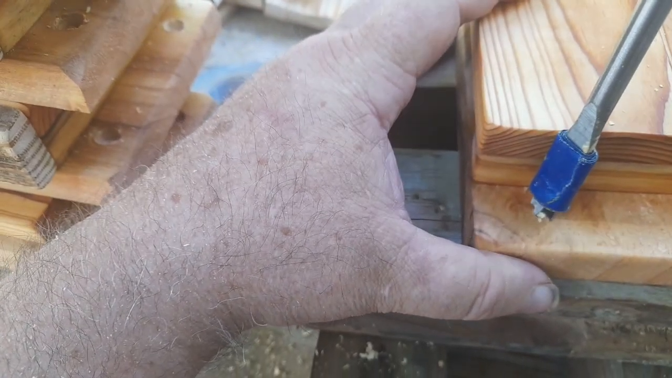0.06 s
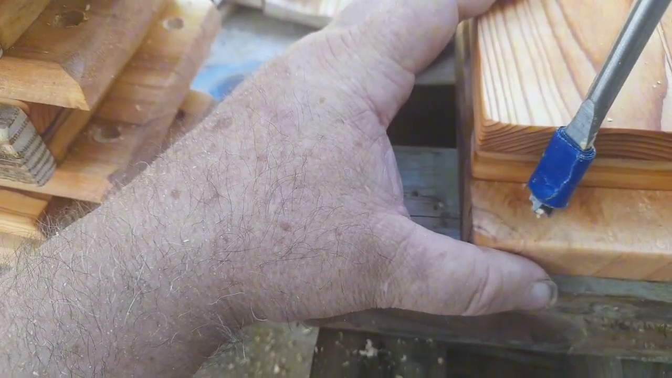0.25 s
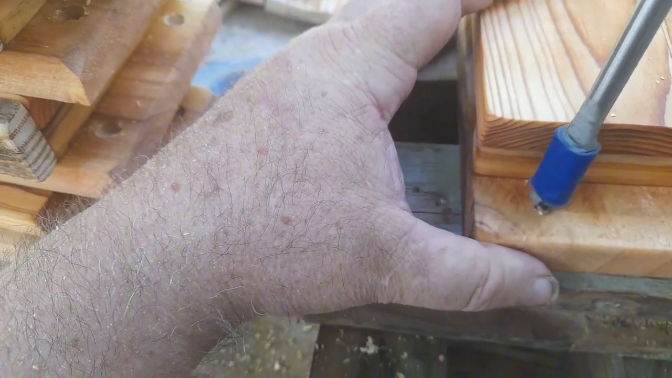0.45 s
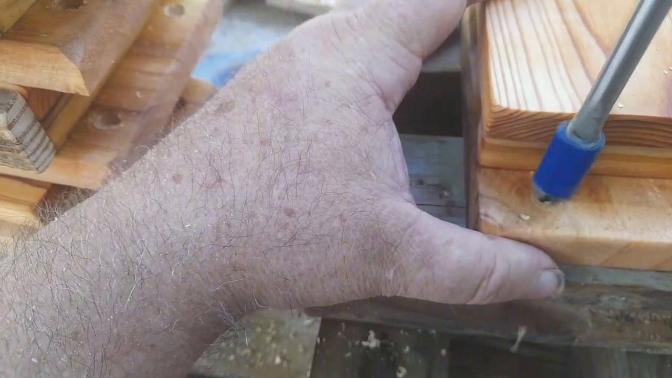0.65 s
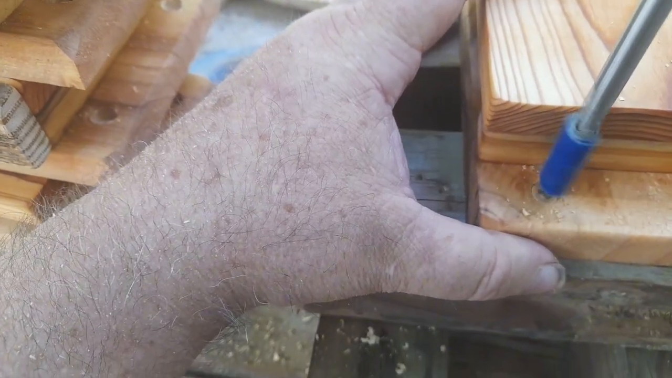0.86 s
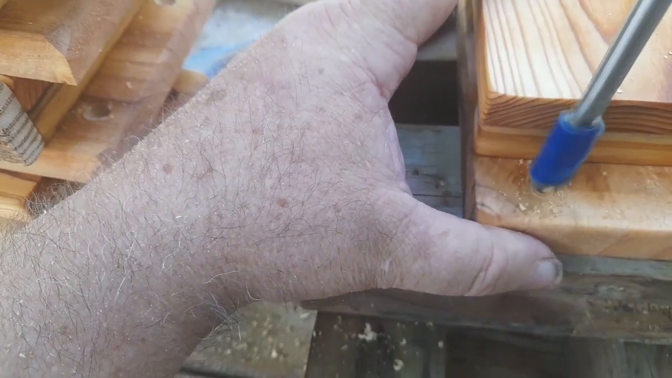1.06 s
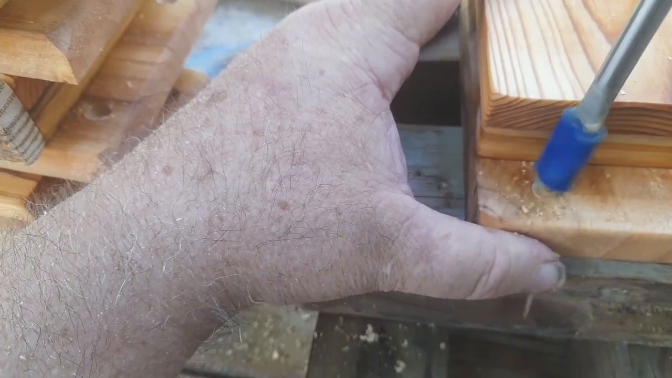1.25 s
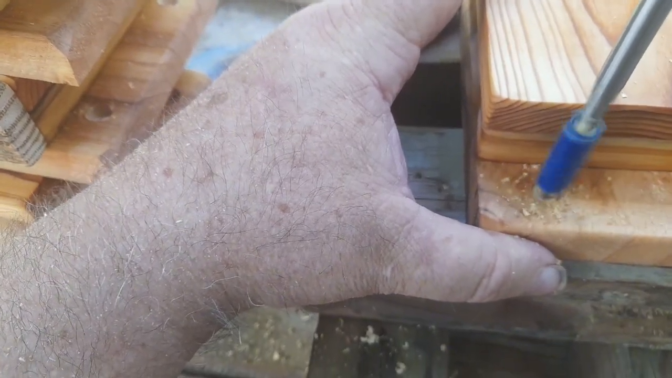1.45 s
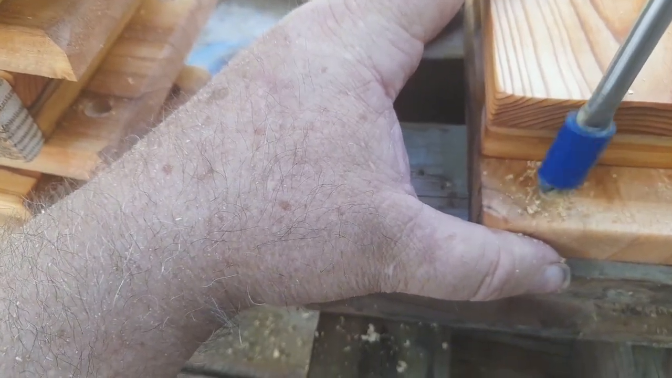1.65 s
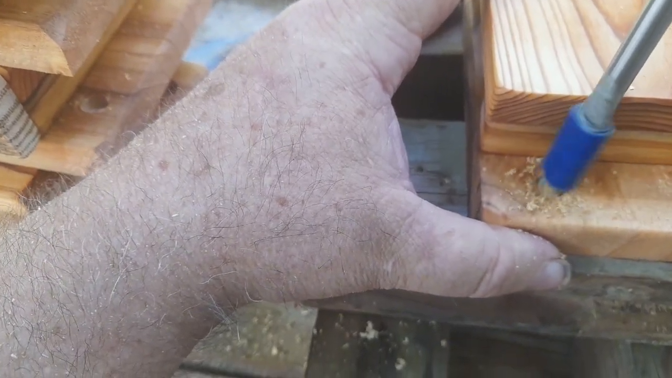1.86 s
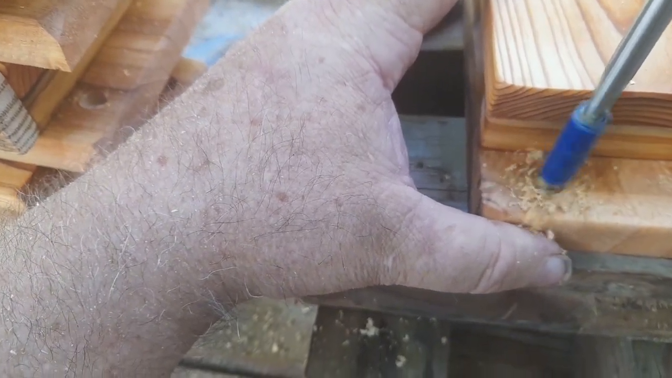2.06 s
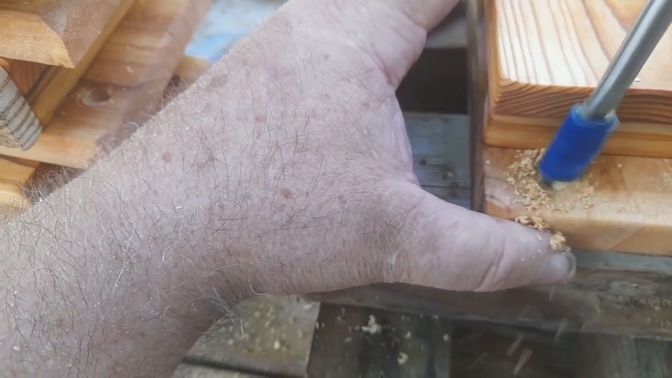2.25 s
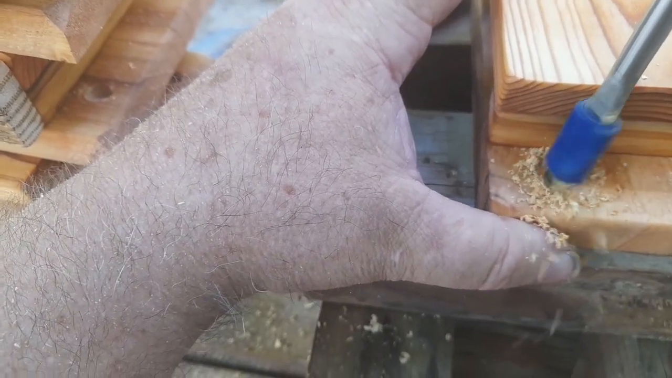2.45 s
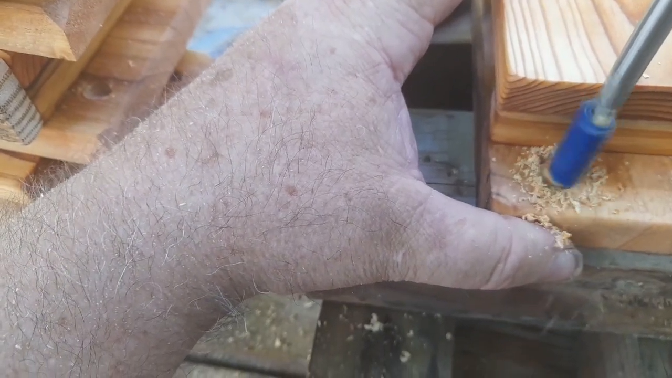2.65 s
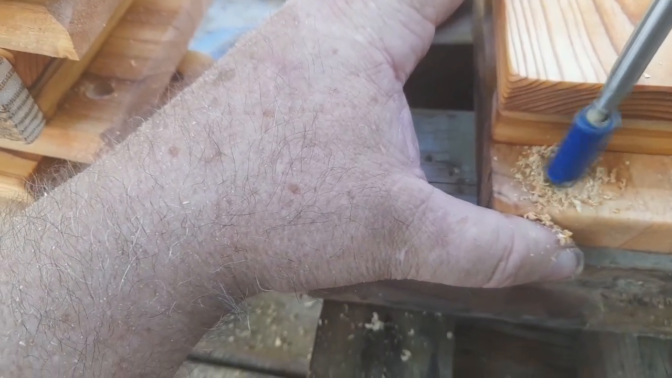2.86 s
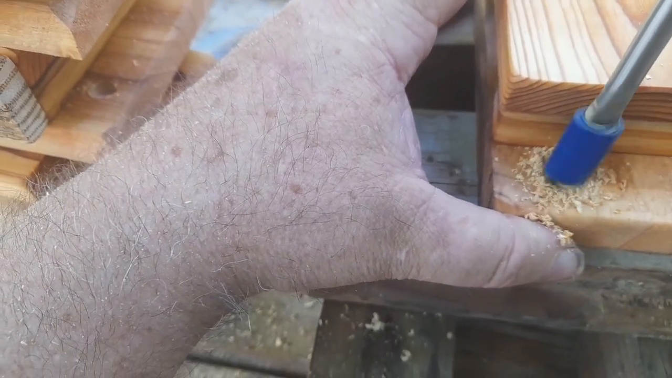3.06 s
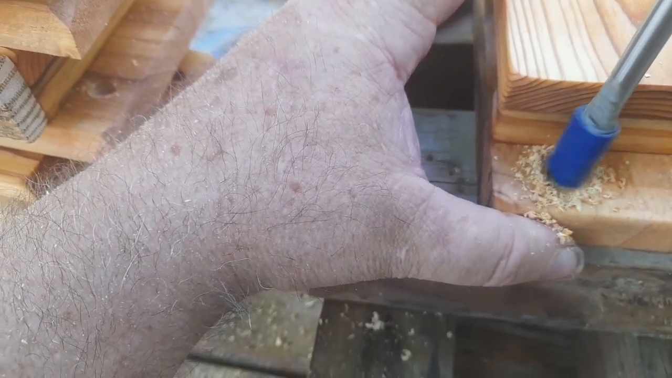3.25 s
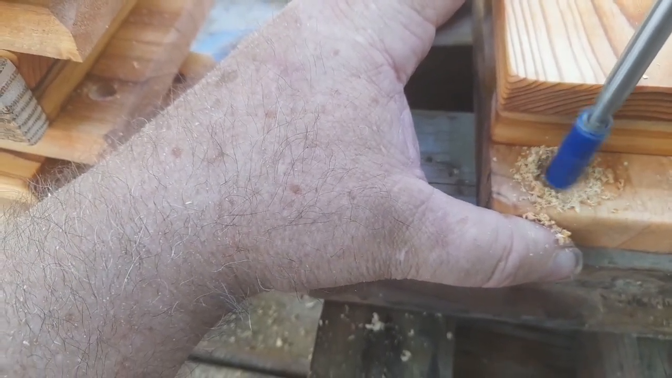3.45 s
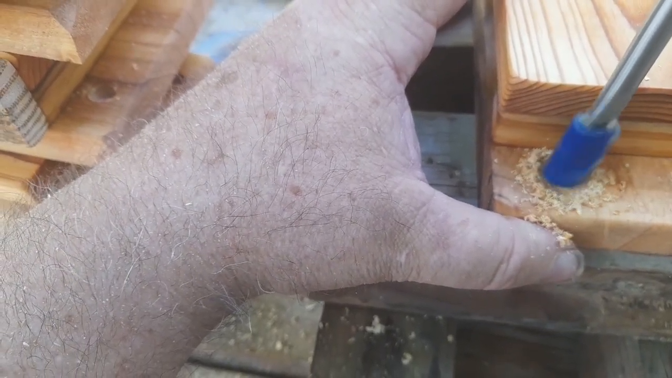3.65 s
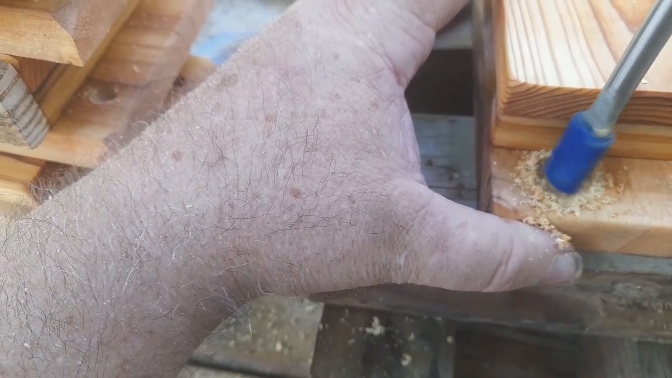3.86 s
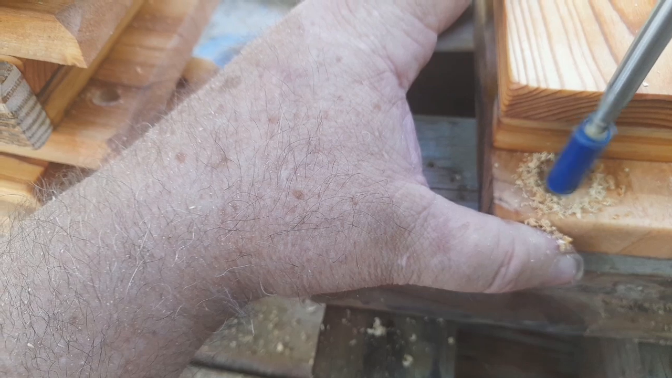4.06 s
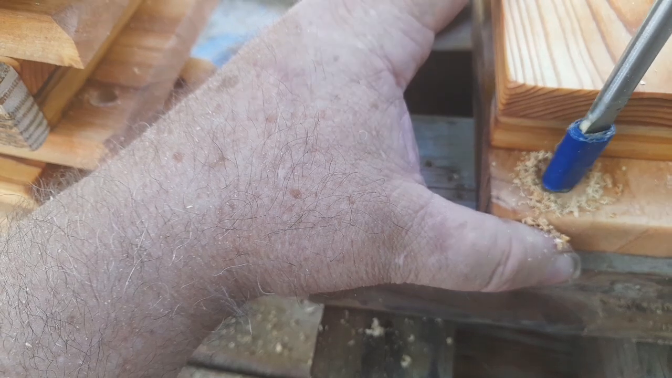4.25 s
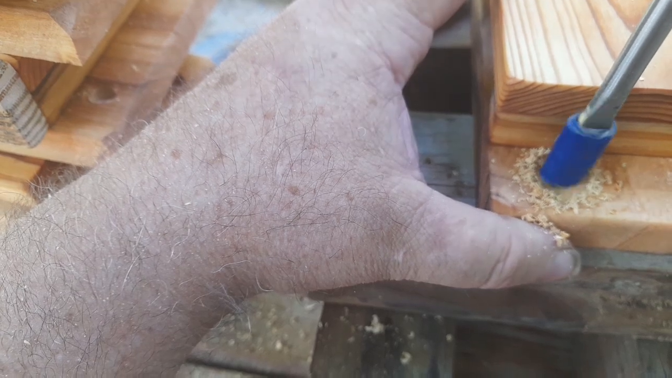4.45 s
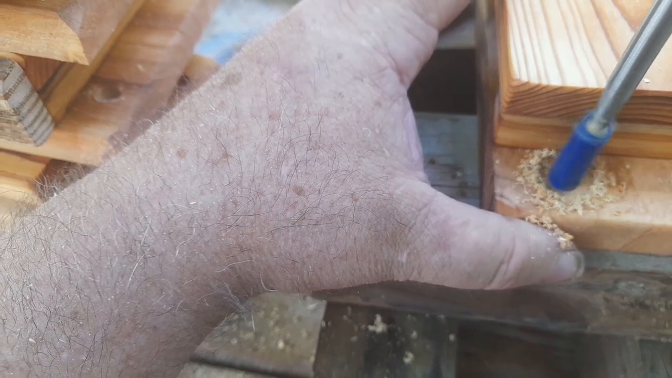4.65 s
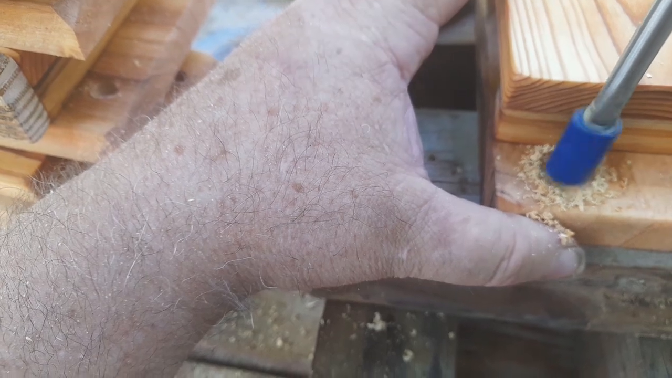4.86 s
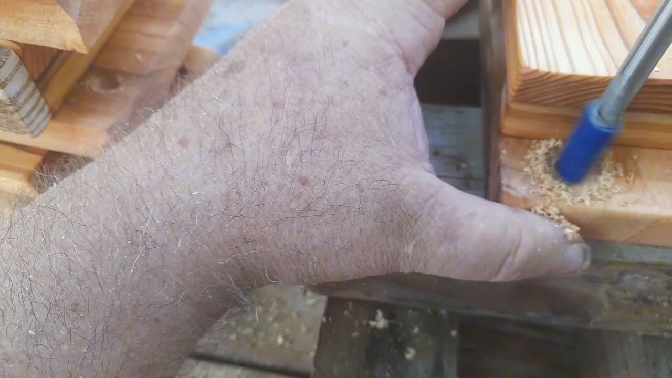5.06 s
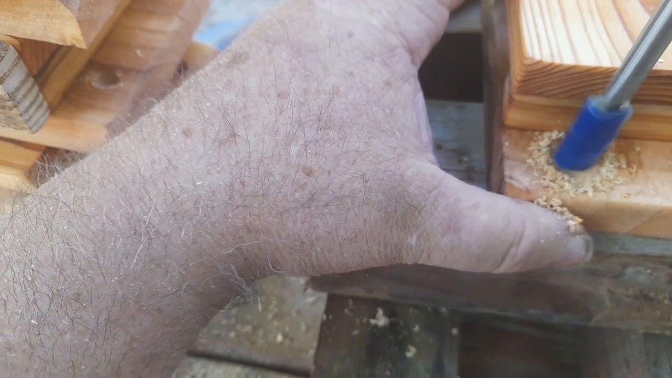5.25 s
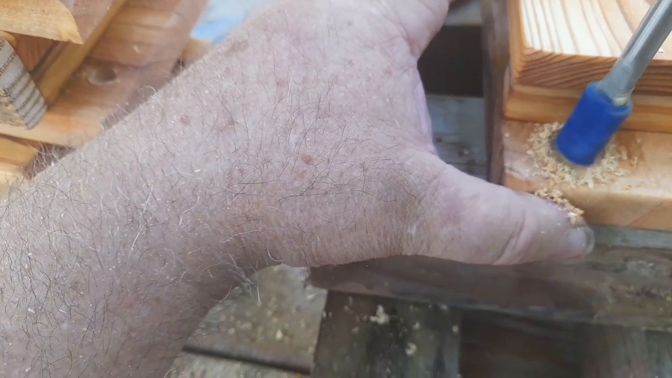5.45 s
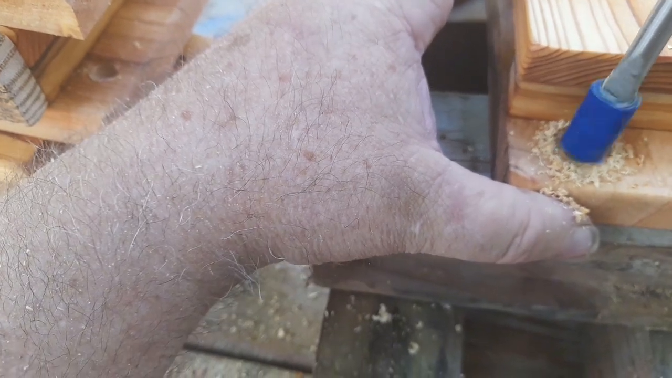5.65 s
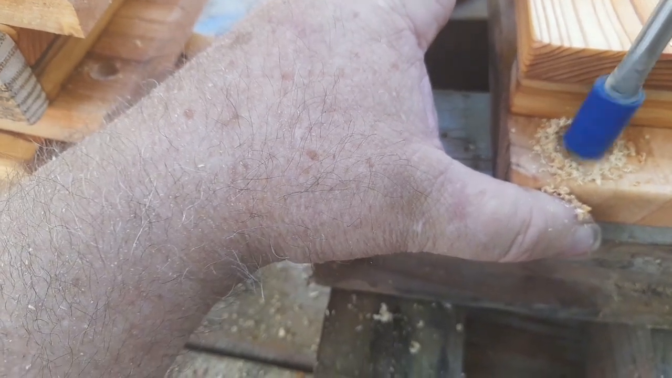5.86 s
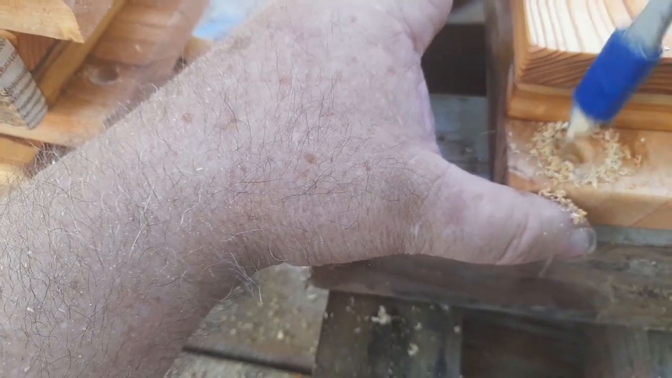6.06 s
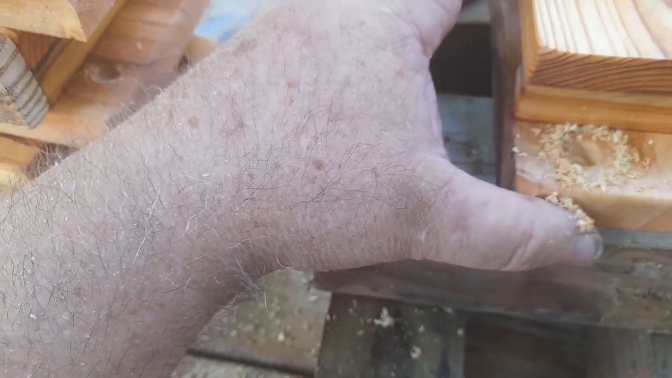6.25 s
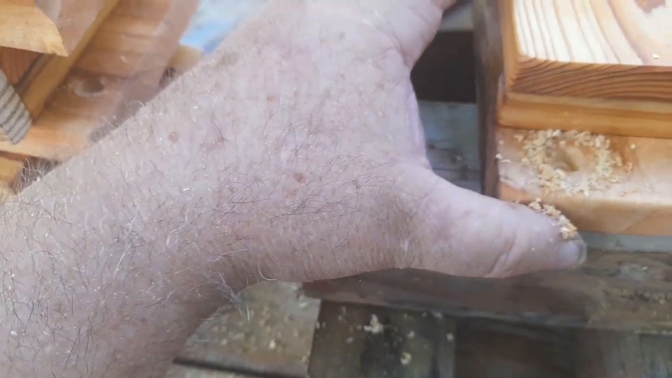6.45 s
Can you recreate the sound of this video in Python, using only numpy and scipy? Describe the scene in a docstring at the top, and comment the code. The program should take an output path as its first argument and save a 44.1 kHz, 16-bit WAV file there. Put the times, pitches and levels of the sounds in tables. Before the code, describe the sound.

Close stereo microphone, the tool slightly to the right, with a faint drone and hiss behind. A motor whine swells, roughens, then the drill roars into a small wooden box, humming, clattering and scraping for nearly four seconds. It halts fast, a soft thud follows, and two more trigger pulls come: one about a second long, one very short and lighter. Clicks of the housing mark the gaps.

```python
"""Power drill in a small wooden box

A power drill with a spade bit runs in three bursts, close by, over a faint drone and hiss: two cut into
the box, and the last spins almost free after the bit backs out; each burst ends under the brake.
The stalled motor whines as a swelling octave that breaks into a rasp, then sine tones hum with its speed.
Throbbing noise and random snaps make the gears' rattle and the bit's scraping, ringing through the box.
Clicks ring the housing; one dull knock falls between the first two bursts."""
import sys
import numpy as np
from scipy import signal
from scipy.fft import rfft, irfft, next_fast_len
from scipy.io import wavfile

SR = 44100
rng = np.random.default_rng(int(sys.argv[2]) if len(sys.argv) > 2 else 0)


def wav_record(signal):
    """Record a signal, one row per channel, as 16-bit PCM in the file named by sys.argv[1]."""
    frames = np.transpose(np.atleast_2d(signal))
    bounded = np.clip(frames, -1, 1)
    # unit amplitude maps onto the largest positive 16-bit level
    quanta = np.round(bounded * 32767).astype(np.int16)
    wavfile.write(sys.argv[1], SR, quanta)


N = 287091

# trigger pulls: pulled t/s, spin-up time/s, released t/s, rattle held after release/s, attack depth/dB,
# starting surge/dB, gear rattle level/dB, scraping level/dB, hum level/dB
BURSTS = [(0.418, .097, 4.208, .029, 14.5, 4, -25.5, -23, -29.5),
          (4.512, .067, 5.512, 0.052, 15, -3, -26.5, -22.5, -30),
          (5.695, .055, 6.048, 0.08, 4, -3.2, -28, -27, -25)]
GEAR_RATIO = 36  # motor turns per spindle turn
MESH_ORDER = 1.25  # gear mesh beats per motor turn


def from_db(db):
    """Decibels to gain."""
    return 10 ** (np.asarray(db) / 20)


def rms_one(x):
    """Scale to unit power."""
    return x / np.sqrt(np.mean(x ** 2) + 1e-20)


def in_time(rows):
    """Each column of a curve at every sample."""
    s, *columns = np.transpose(rows)
    return [np.interp(np.arange(N) / SR, s, c) for c in columns]


def ramp(start_s, length_s):
    """Rises from 0 to 1 and stays there."""
    return np.clip((np.arange(N) / SR - start_s) / length_s, 0, 1)


def over_hz(points):
    """A table read at every FFT bin, on a log-frequency axis."""
    hz, value = np.transpose(points)
    bins_hz = np.fft.rfftfreq(next_fast_len(N), 1 / SR)
    return np.interp(np.log(bins_hz + 1e-9), np.log(hz), value)


def colour(x, db):
    """Filter by a gain in dB per FFT bin."""
    size = next_fast_len(N)
    return irfft(rfft(x, size) * from_db(db), size)[..., :N]


def drift(rate):
    """Slow chance at about a rate in Hz, with unit spread and its extreme swings tamed."""
    step = 40  # samples between slow values
    r = np.exp(-2 * np.pi * rate * step / SR)
    noise = rng.standard_normal(N // step + 2002)
    slow = signal.lfilter([1], [1, -2 * r, r * r], noise)[2000:]  # drop the filter's start-up
    tamed = rms_one(np.tanh(rms_one(slow) / 2))
    return np.interp(np.arange(N) / step, np.arange(len(slow)), tamed)


def resonate(x, hz, width_hz):
    """A two-pole resonance with gain 1 on top."""
    r = np.exp(-np.pi * width_hz / SR)
    numerator = np.array([1, 0, -1]) * (1 - r * r) / 2
    return signal.lfilter(numerator, [1, -2 * r * np.cos(2 * np.pi * hz / SR), r * r], x)


def spread(pair):
    """Two unrelated signals become left and right, more alike in the bass and wide in the treble."""
    # between the ears: f/Hz, likeness [0-1]
    likeness = [(60, .5), (160, 0.93), (420, 0.62), (800, 0.56), (1200, 0.81), (1700, 0.24), (3000, 0.37),
                (4200, 0.01), (15000, 0)]
    alike = np.clip(over_hz(likeness), -.95, .97)
    mid, side = colour(pair, 10 * np.log10([1 + alike, 1 - alike]))
    return np.array([mid + side, mid - side]) / np.std(mid)


def workshop():
    """A faint, dull drone under a thin hiss, both shaped noise; their levels rise and sink slowly."""
    # low drone: f/Hz, relative level/dB
    drone_spectrum = [(18, -42), (35, -19), (110, -5.5), (400, -1.5), (600, -8), (850, -18.5),
                      (2000, -40.5)]
    # thin hiss: f/Hz, relative level/dB
    hiss_spectrum = [(300, -13), (1200, -6.5), (2400, -0.5), (4000, -5.5), (6300, -4), (7800, -2),
                     (9000, -16), (15000, -12.5)]
    # background curve: t/s, drone level/dB, hiss level/dB
    levels = [(0, -52, -63.5), (.4, -52, -63.5), (4.36, -66, -78), (4.47, -63, -70), (5.65, -57.5, -69),
              (6.22, -52.5, -65), (6.3, -59, -61.5), (6.5, -58.5, -55.5)]
    drone_db, hiss_db = in_time(levels)
    drone = spread(colour(rng.standard_normal((2, N)), over_hz(drone_spectrum)))
    hiss = spread(colour(rng.standard_normal((2, N)), over_hz(hiss_spectrum)))
    return from_db(drone_db) * drone + from_db(hiss_db) * hiss


# the stalled whine's fundamental and rasp hold while the octave swells
WHINE_DB, OCTAVE_DB, RASP_DB = -43, -36, -61.5
OCTAVE_SWELL_S, OCTAVE_SWELL_DB = .145, 20
# then the note breaks: the tones drop and the rasp rises
BREAK_AT_S, BREAK_S = 0.256, .015
BREAK_TONE_LOSS_DB, BREAK_OCTAVE_LOSS_DB, BREAK_RASP_GAIN_DB = 8, 18, 12.5


def stalled_whine():
    """Chopped current makes the standing motor sing; the note breaks into a rasp just before it turns."""
    # note under a half-pulled trigger: t/s, f/Hz
    pitch = [(0, 785), (.07, 762), (.19, 738), (.26, 760), (.275, 630), (.33, 626), (.375, 720.4),
             (.418, 750)]
    # overtones: multiple of the fundamental, level against the full octave/dB
    overtone_levels = [(3, -35), (4, -36), (6, -40), (7, -43), (9, -26), (13, -43)]
    # resonances of the rasp: f/Hz, width/Hz, relative level/dB
    rasp_resonances = [(1320, 45, -3.5), (1490, 310, 1), (1990, 100, -2)]
    hz, = in_time(pitch)
    broken = ramp(BREAK_AT_S, BREAK_S)
    # pitch and level waver more once the note is broken
    phase = 2 * np.pi * np.cumsum(hz * (1 + (.0024 + .014 * broken) * drift(120))) / SR
    first_db = WHINE_DB - BREAK_TONE_LOSS_DB * broken + (1.5 + 3.5 * broken) * drift(50)
    first = from_db(first_db) * np.sin(phase)
    octave = from_db(OCTAVE_SWELL_DB * (ramp(0, OCTAVE_SWELL_S) - 1)) * np.sin(2 * phase)
    overtones = sum(from_db(db + 3.3 * drift(8.9)) * np.sin(round(k) * phase) for k, db in overtone_levels)
    upper_db = OCTAVE_DB - BREAK_OCTAVE_LOSS_DB * broken + drift(40)
    upper = from_db(upper_db) * (octave + overtones)
    noise = rng.standard_normal((2, N))
    rasp = rms_one(sum(from_db(db) * resonate(resonate(noise, centre, width), centre, width)
                       for centre, width, db in rasp_resonances))
    rasp = from_db(RASP_DB + BREAK_RASP_GAIN_DB * broken) * rasp
    standing = np.arange(N) / SR < BURSTS[0][0]
    return (first + upper + rasp) * standing


def clicks():
    """Each trigger or chuck click rings the housing's modes with strengths of its own."""
    # clicks: t/s, strength/dB
    click_list = [(0.417, -22), (4.476, -40), (4.486, -44), (5.66, -33.5), (5.666, -34), (5.697, -15.5),
                  (6.129, -3.5), (6.227, -37.5), (6.242, -39)]
    # drill housing modes: f/Hz, relative level/dB, t60/s
    modes = [(1160, -9, 0.0147), (1450, -15, 0.013), (2220, -7, .014), (2900, 0.5, 0.011),
             (3570, -1, 0.0091), (4230, -8, 0.0069), (4900, -0.5, 0.0029), (5900, -21, .01),
             (6900, -7, 0.013), (11600, -8.5, .003), (14500, -12, .003)]
    s, strength_db = np.transpose(click_list)
    out = np.zeros((2, N))
    for hz, db, t60 in modes:
        taps = np.full((2, N), 1e-18)  # a tiny offset keeps the filter out of denormals
        uneven = from_db(rng.normal(0, 3.9, (len(s), 2)).T) * rng.choice([-1, 1], len(s))
        taps[:, (s * SR).astype(int)] = from_db(strength_db + db) * uneven / np.sqrt(len(modes))
        r = from_db(-60 / (t60 * SR))  # decay per sample
        w = 2 * np.pi * hz / SR
        out += signal.lfilter([0, np.sin(w)], [1, -2 * r * np.cos(w), r * r], taps)
    return out


# a burst's noise swells, settles, sinks slowly, and dies under the brake
ATTACK_S, SURGE_S = 0.053, 0.17
SINK_DB_PER_S, RELEASE_DB_PER_S, BRAKE_S = 0.23, 470, .066
HUM_SPEED_POWER = 1.9  # the out-of-balance hum grows steeply with speed


def burst(pulled, spin_up_s, released, rattles_on_s, attack_db, surge_db, rattle_db, scrape_db, hum_db, push):
    """One trigger pull: share of full speed, and gains of rattle, motor strain, scraping, hum and rumble."""
    t = np.arange(N) / SR
    age, braking = np.maximum(t - pulled, 0), np.maximum(t - released, 0)
    slowed = 1 - np.exp(-(braking / BRAKE_S) ** 2)
    spin = (1 - np.exp(-age / spin_up_s)) * (1 - slowed)
    running = (t >= pulled) * from_db(-RELEASE_DB_PER_S * np.maximum(braking - rattles_on_s, 0))
    swell_db = attack_db * (ramp(pulled, ATTACK_S) - 1)
    effort_db = swell_db + surge_db * np.exp(-age / SURGE_S) - SINK_DB_PER_S * age
    rattle, scrape = running * from_db([rattle_db + effort_db, scrape_db + effort_db])
    # the motor strains while braked, and less while spinning up
    strain = running * 4 * spin * (slowed + (1 - slowed) * spin * (1 - spin) / 2)
    hum = from_db(hum_db) * spin ** HUM_SPEED_POWER
    push_db, = in_time(push)
    return np.array([spin, rattle, strain, scrape, hum, running * from_db(push_db)])


def flutter(turns, multiple):
    """One tone of the drive, fluttering as the bit wobbles; higher ones differ more between the ears."""
    phase = 2 * np.pi * multiple * turns + .5 * drift(30)
    mid = from_db(1.9 * drift(27.5)) * np.sin(phase)
    side = min(.25 * np.sqrt(multiple), 1) * drift(14) * np.cos(phase)
    return np.sqrt(2) * np.array([mid + side, mid - side])


HUM_RESONANCE_HZ, HUM_WIDTH_HZ = 371.2, 46  # just under full speed
CAGE_ORDER, CAGE_DB = .385, -22  # bearing cage: multiple of motor speed, level against the hum


def rotor_hum(turns, strength):
    """One shake per turn, blooming as the speed meets the resonance; a bearing cage drones below it."""
    imbalance = np.sqrt(2) * np.sin(2 * np.pi * turns) * strength
    shake = resonate(imbalance, HUM_RESONANCE_HZ, HUM_WIDTH_HZ)
    cage = strength * from_db(CAGE_DB) * flutter(turns, CAGE_ORDER)
    return shake * from_db(1.15 * drift(20)) + cage


SLOT_ORDER = 5  # slot whine as a multiple of motor speed
# level against the gear rattle, dB per turn per s lost to the load, level when braked to half speed
SLOT_DB, SLOT_LOAD_DB, SLOT_STRAIN_DB = -10.5, 0.4346, -34


def slot_whine(turns, cutting, sag, strain):
    """The armature slots sing when the motor draws current: under the cut, spinning up and braking."""
    strength = cutting * from_db(SLOT_DB + SLOT_LOAD_DB * sag) + strain * from_db(SLOT_STRAIN_DB)
    return flutter(turns, SLOT_ORDER) * strength


def grains(per_s, size_db):
    """Random snaps of uneven size, each reaching the two ears in its own way."""
    born = rng.random(N) < per_s / SR
    size = from_db(size_db * np.minimum(rng.exponential(1, N), 3))
    return born * size * rng.uniform(-1, 1, (2, N))


def throb(cycles, depth):
    """One swell per cycle, at unit power."""
    return rms_one(np.exp(depth * np.cos(2 * np.pi * cycles)))


def gears(turns):
    """Teeth clatter at the mesh rate over fan hiss; three planet gears sway the load each spindle turn."""
    # gear noise: f/Hz, relative level/dB
    gear_spectrum = [(120, -27.5), (230, -11), (330, -3.5), (480, -4), (780, -5), (1300, 4), (1700, -0.5),
                     (3300, 4.5), (3850, 0), (7150, 1.5), (8000, -17), (9600, -12.5), (12000, -7),
                     (16000, -13)]
    clatter = rng.standard_normal((2, N)) + from_db(-3.5) * rms_one(grains(3500, size_db=2.3))
    spindle = turns / GEAR_RATIO
    sway = throb(spindle, depth=0.037) * throb(2 * spindle, depth=0.036) * throb(3 * spindle, depth=0.081)
    drive = clatter * throb(MESH_ORDER * turns, depth=.14) * sway * from_db(.5 * drift(28))
    return spread(colour(drive, over_hz(gear_spectrum)))


def box(x):
    """Whatever shakes the bit rings the wooden box's resonances, alternating in sign."""
    # wooden box and bit: f/Hz, width/Hz, level/dB
    resonances = [(458, 96, -4.5), (612, 73, -3), (1004, 142, -5.5), (1197, 73, -1), (1430, 100, 1.5),
                  (1855, 96, -1), (2320, 148, 0.5), (3030, 190, -5.5), (3406, 83, -5.5)]
    return sum((-1) ** k * from_db(db) * resonate(x, hz, width)
               for k, (hz, width, db) in enumerate(resonances))


def motor_tones(turns):
    """Armature and gear tones swell as their pitch sweeps through the box's resonances."""
    # tones reaching the box through the bit: multiple of motor speed, relative level/dB
    orders = [(1.17, -10.5), (1.25, -10.5), (1.999, -5), (2.5, -15), (3, -8), (4, -17), (6.25, -10.5)]
    return box(sum(from_db(db) * flutter(turns, multiple) for multiple, db in orders))


def scraping(turns):
    """The two cutting edges scrape in random snaps, harder once a turn; the gear mesh shakes the bit."""
    spindle = turns / GEAR_RATIO
    bite = throb(spindle, depth=0.063) * throb(2 * spindle, depth=0.064) * throb(MESH_ORDER * turns, depth=0.4)
    return spread(box(grains(5000, size_db=2.5) * bite * from_db(0.57 * drift(35))))


def rumble(turns, spin):
    """Each edge shoves the box unevenly against the bench, and the bit chatters eight times a turn."""
    # shoves: f/Hz, relative level/dB
    shove_spectrum = [(15, -49.5), (30, -33), (60, -0.5), (85, 5), (120, 0.5), (150, -3), (185, -5),
                      (280, -16), (500, -58)]
    spindle = turns / GEAR_RATIO
    shoves = rng.standard_normal((2, N)) * throb(2 * spindle, depth=0.11) * from_db(1.1 * drift(13))
    chatter = spin * np.sin(2 * np.pi * 8 * spindle + .6 * drift(8))
    return spread(colour(shoves, over_hz(shove_spectrum))) + from_db(-5.0) * chatter


FREE_TURNS_PER_S = 397  # motor speed without load
# hum and slot whine fade as the bit backs out of the hole, and stay down for the last burst
BACK_OUT_AT_S, BACK_OUT_S, BACK_OUT_LOSS_DB = 5.17, 0.28, 11.5


def drill():
    """The motor spins up, sags in the first burst and is braked; its turns time every layer."""
    # motor speed while the first burst cuts the hole: t/s, speed/turns per s
    cutting_curve = [(0.95, 398), (1.97, 391.5), (2.03, 381), (2.48, 390), (2.54, 384.5), (3.28, 383.4),
                     (3.9, 394.4), (4.15, 396)]
    # push of the bit on the box, one curve per burst: t/s, rumble level/dB
    push_curves = [
        [(0.45, -54), (0.6, -45), (1.78, -46), (1.8, -42.5), (2.0, -48), (2.27, -39.5), (2.39, -43), (4.2, -53),
         (4.22, -47.5)],
        [(4.53, -55.5), (4.602, -50), (4.62, -46.5), (5.02, -41.5), (5.58, -54.5)],
        [(5.72, -58), (5.912, -68), (6.132, -54), (6.15, -56.5)],
    ]
    bursts = sum(burst(*row, push) for row, push in zip(BURSTS, push_curves))
    spin, rattle, strain, scrape, hum, shake = bursts
    cutting_speed, = in_time(cutting_curve)
    sag = (FREE_TURNS_PER_S - cutting_speed) * (np.arange(N) / SR < BURSTS[1][0])
    speed = spin * (FREE_TURNS_PER_S - sag) * (1 + 0.0025 * drift(13.6))
    turns = np.cumsum(speed) / SR
    contact = from_db(-BACK_OUT_LOSS_DB * ramp(BACK_OUT_AT_S, BACK_OUT_S))
    rotor = rotor_hum(turns, hum * contact) + slot_whine(turns, rattle * contact, sag, strain)
    gearbox = rattle * (from_db(3.5) * gears(turns) + from_db(-0.5) * motor_tones(turns))
    wood = scrape * from_db(-3) * scraping(turns) + shake * from_db(1.16) * rumble(turns, spin)
    return rotor + gearbox + wood


# the bit is set down in the hole
THUD_S, THUD_DB, THUD_HZ, THUD_T60 = 4.482, -44, 100, 0.17


def thud():
    """One dull knock of the box on the bench: a decaying low sine."""
    age = np.maximum(np.arange(N) / SR - THUD_S, 0)
    return from_db(THUD_DB - 60 * age / THUD_T60) * np.sin(2 * np.pi * THUD_HZ * age)


def nearby(x):
    """Close surfaces comb the sound with faint short echoes."""
    # echoes off the bench and the hand: delay/s, gain [linear]
    echoes = [(.00102, 0.015), (.0029, 0.079), (.0071, .1)]
    return x + sum(gain * np.pad(x, ((0, 0), (int(s * SR), 0)))[:, :N] for s, gain in echoes)


def scene():
    """The drill is held a little to the right, over the workshop's background."""
    # left minus right: f/Hz, level difference/dB
    lean = [(60, -2), (110, 3.5), (200, -5), (380, -2), (700, 1.5), (1290, -5), (2380, -2.5), (4400, -1),
            (8120, -4), (15000, -2.0)]
    # phase by which the right leads: f/Hz, phase/rad
    lead = [(500, 0), (720, 1.64), (1000, 0.38), (1550, 1.1), (2150, 0.23), (3000, -0.096)]
    tool = nearby(drill() + stalled_whine() + clicks() + thud())
    half = np.array([[.5], [-.5]])  # each ear takes half of the difference
    size = next_fast_len(N)
    ears = from_db(half * over_hz(lean)) * np.exp(-1j * half * over_hz(lead))
    return irfft(rfft(tool, size) * ears, size)[:, :N] + workshop()


CUTOFF_HZ = 15750


def record(dry):
    """The tallest peaks are rounded and the top is cut steeply."""
    rounded = dry / (1 + (dry / .75) ** 4) ** .25
    low_pass = signal.ellip(12, .1, 80, CUTOFF_HZ, fs=SR, output="sos")  # 0.1 dB ripple, 80 dB stop
    return signal.sosfilt(low_pass, rounded)


dry = scene()
out = record(dry)
wav_record(out)
```